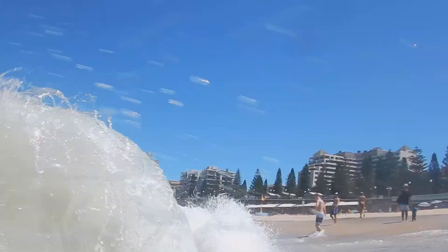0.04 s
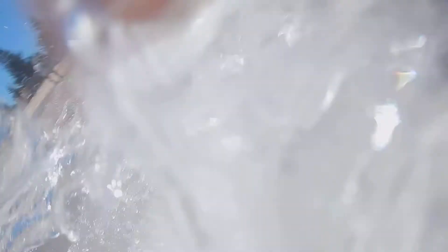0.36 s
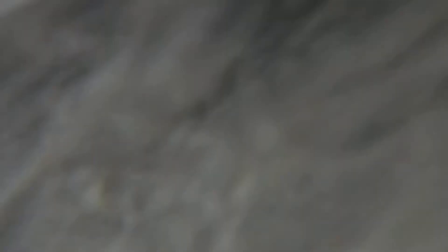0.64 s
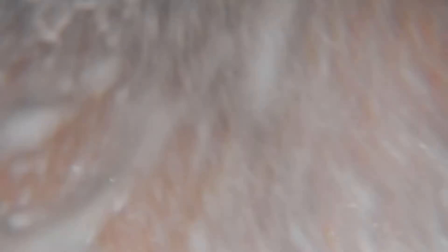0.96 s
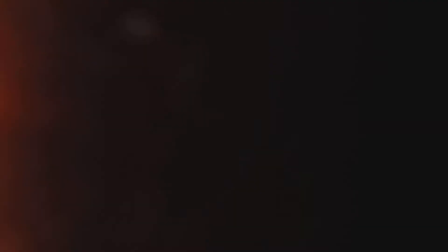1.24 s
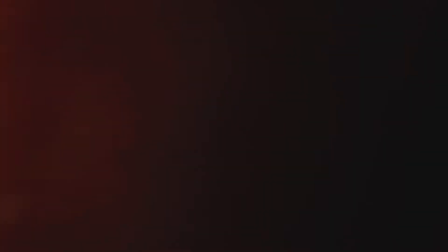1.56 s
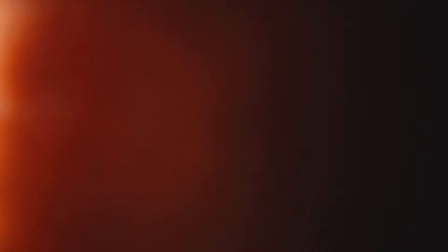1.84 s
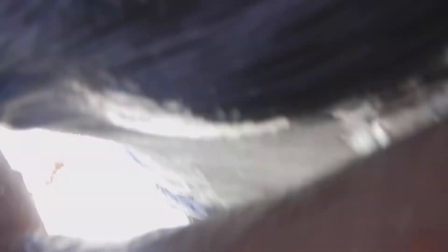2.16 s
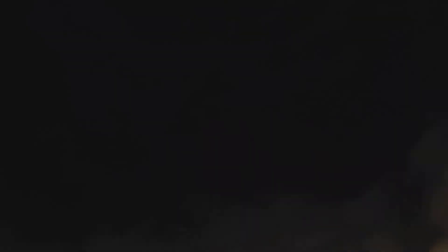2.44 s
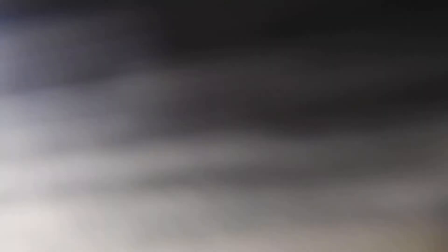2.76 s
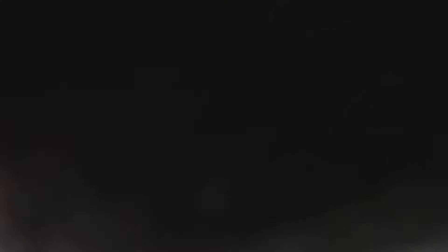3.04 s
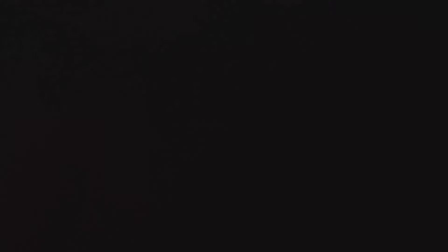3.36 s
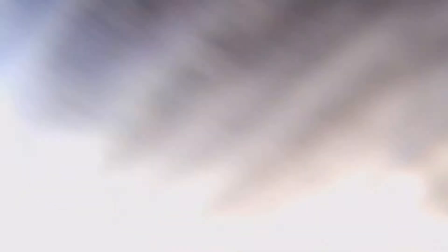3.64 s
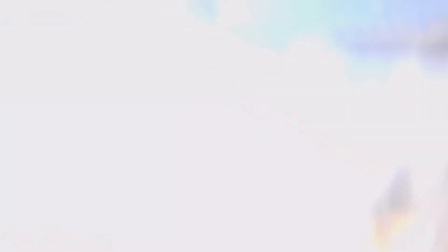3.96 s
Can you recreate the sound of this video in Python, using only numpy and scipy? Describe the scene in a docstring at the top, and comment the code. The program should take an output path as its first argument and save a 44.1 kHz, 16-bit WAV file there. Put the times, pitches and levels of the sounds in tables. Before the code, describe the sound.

Hissing surf breaks into loud churning bubbles, followed by dull underwater washing and bumps.

```python
"""A wave over a waterproof camera

Hissing surf closes in across the shallows, then a dense cloud of ringing bubbles churns against
the two microphone ports and overloads them. Under water all turns dull: gurgling, eddies and knocks
on one port or the other, and a faint fizz of foam as the camera tumbles near the surface."""
import sys
import numpy as np
from scipy import signal
from scipy.fft import rfft, irfft
from scipy.io import wavfile
from scipy.ndimage import uniform_filter1d, minimum_filter1d

SR = 44100
rng = np.random.default_rng(int(sys.argv[2]) if len(sys.argv) > 2 else 0)


def transcribe(signal):
    """Save signal, clipped to [-1, 1], as a 16-bit WAV file at the path in sys.argv[1]."""
    frames = np.atleast_2d(signal).T
    limited = np.clip(frames, -1, 1)
    pcm = np.round(limited * 32767).astype(np.int16)
    wavfile.write(sys.argv[1], SR, pcm)


N = 176400

# The bubble cloud's envelope. Each row: time in seconds, body level and spray level in relative dB.
CHURN_ENVELOPE = [(.42, -27, -32.5), (.485, -17.5, -34), (.52, -11, -33), (.58, -8, -22.5), (.83, -8, -26),
                  (.885, -19, -38.5), (.915, -11, -31), (.953, -25, -55), (.966, -7, -27.5),
                  (1.1, -17.5, -46.5), (1.125, -13, -29), (1.18, -16.5, -52), (1.245, -13.5, -38.5),
                  (1.305, -16.5, -42.5), (1.32, -20, -54), (1.38, -20, -55), (1.425, -28.5, -56),
                  (1.5, -25.5, -53), (1.6, -37, -73)]
# Envelopes of the other bubbling layers. Each row: time in seconds, level in relative dB.
SURF_ENVELOPE = [(0, -28.5), (.02, -25), (.10, -28), (.13, -21), (.178, -21.5), (.205, -31.5), (.3, -32.5),
                 (.39, -34.5), (.47, -26.5)]
GURGLE_ENVELOPE = [(1.55, -33.5), (1.66, -35.5), (1.77, -35.5), (1.82, -40.5), (1.9, -32.5), (1.97, -37),
                   (2.16, -35), (2.22, -66)]
WASH_ENVELOPE = [(2.2, -44.5), (2.45, -42), (2.6, -43), (2.72, -44), (2.78, -47), (3.0, -49), (3.15, -48),
                 (3.38, -41.5), (3.52, -47), (3.62, -38.5), (3.76, -39.5), (3.86, -44), (4, -44.5)]
FIZZ_ENVELOPE = [(1.76, -75), (1.82, -58), (1.92, -82.5), (2.18, -65), (2.3, -64), (2.55, -56.5),
                 (2.7, -49.5), (2.75, -70), (3.0, -76), (3.15, -68), (3.36, -70), (3.452, -48), (3.47, -75),
                 (3.56, -69), (3.595, -56), (3.78, -64), (3.87, -57), (3.96, -59)]
# The tone of each layer. Each row: frequency in Hz, gain in relative dB.
CHURN_EQ = [(30, -10), (60, -13), (110, 5), (220, -2.5), (330, 1), (560, -6), (760, -4), (1120, -5),
            (1600, -14.5), (2200, -12.5), (2600, -19), (4000, -41)]
SPRAY_EQ = [(1500, -20), (2900, 4.5), (4000, -7.5), (5600, -5), (7000, -13), (9000, -19.5), (10500, -29.5),
            (15500, -29)]
SURF_EQ = [(40, -4), (110, 4.5), (240, 6), (540, -0.5), (1650, -2), (2400, -10.5), (4200, -19.5),
           (5300, -10.5), (9300, -23.5), (12000, -49)]
EDDY_EQ = [(25, -8), (55, 0), (105, 5), (400, -12.5), (800, -19), (3200, -51)]
GURGLE_EQ = [(30, -4), (140, 10), (400, 2), (850, 0), (1900, -13.5), (2500, -29), (4000, -46), (5800, -36),
             (8000, -58)]
WASH_EQ = [(30, 11), (110, 3), (380, -5), (620, -4.5), (900, -10.5), (1400, -9), (2100, -9), (2700, -19),
           (4000, -34.5)]
FIZZ_EQ = [(1800, -4), (3100, 21.5), (4100, 15), (5700, 17), (7200, 0), (10000, -16.5), (15000, -38)]
# Balance between the ports. Each row: frequency in Hz, pan in dB (always left minus right).
CHURN_PAN = [(60, 41), (150, -4.5), (260, -7.5), (370, -4), (560, 3.5), (850, 7), (1250, 6.5), (2200, 2.5)]
WASH_PAN = [(40, -31), (90, -3.5), (550, -3), (900, -0.5), (1800, 13.5), (3500, -1.5)]
# Single large bubbles. Each row: start in seconds, level in dB, starting pitch in Hz,
# ring time in seconds, pan in dB.
GLUGS = [(0.499, 11, 402, 0.045, 10.5), (0.505, 5, 200, 0.18, 5.5), (0.584, 7, 334, 0.093, -11),
         (0.633, 7.5, 226, 0.1, -2), (.69, 6.5, 248.3, .2, -5.5), (.808, 6, 423, 0.096, -6),
         (0.908, 1.5, 940, 0.035, 5), (0.934, 0, 313, 0.073, -23), (1.045, 5, 430, 0.093, -11.5),
         (1.11, 3.5, 850, 0.17, 34), (1.163, -2, 325.5, 0.13, -8), (1.198, 0, 212, 0.081, -1),
         (1.234, 3.5, 277, 0.15, -11), (1.294, 6.5, 330, 0.055, -5.5), (1.403, 4, 1820, 0.02, 19),
         (1.547, 2, 1036, 0.047, 15), (1.697, -15, 870, 0.032, 8), (2.908, 3, 351, 0.025, -20),
         (2.914, 1, 508, .022, -40.5)]
# Water knocking on a port. Each row: start in seconds, level in dB before the low-pass, pitch in Hz,
# ring time in seconds, low-pass cutoff in Hz, pan in dB.
PORT_KNOCKS = [(1.477, 3.5, 89, 0.03, 400, 24), (1.563, 5, 320, 0.013, 900, -20),
               (1.579, -2, 111, 0.037, 500, -18), (1.914, -1, 100, 0.016, 303, 28),
               (2.127, 6, 160, 0.028, 454, -25), (2.146, -2.5, 180, 0.014, 1190, 21),
               (2.167, 2.5, 185, 0.024, 1030, -22), (2.245, -7, 110, .013, 1110, 29),
               (2.639, 2, 277, 0.021, 1100, -23), (2.832, 1.5, 183, 0.023, 900, -27),
               (2.849, -10.5, 82, 0.22, 200, -33), (2.907, -0.5, 223, 0.035, 890, -27.5),
               (2.98, -21, 146, 0.065, 616, -23.5), (3.165, -21, 410, 0.018, 1000, -15),
               (3.419, 1, 95, 0.025, 2620, -34), (3.462, -7, 102, 0.079, 400, -27.5),
               (3.57, -2, 91, 0.032, 298, -36), (3.593, -4.5, 45, 0.035, 470, -37),
               (3.829, 4.5, 101, 0.024, 2290, -52)]
# Spits and gushes of water and air. Each row: start in seconds, level in dB, band centre in Hz,
# decay in seconds, pan in dB.
PORT_SPITS = [(0.238, -23.5, 4460, 0.0056, 4), (0.468, -15, 5300, 0.0074, -6),
              (0.59, -14.5, 11500, 0.0041, 55), (.91, -17, 2580, 0.0057, 8),
              (.965, -20.5, 12300, 0.0034, 2), (0.963, -22.5, 6100, 0.0044, 2),
              (1.232, -25, 4200, 0.0023, 1), (1.402, -30, 4350, 0.0025, 0.5), (1.455, -38, 4630, 0.014, 1),
              (1.544, -5.5, 970, 0.01, 4.5), (1.548, -17, 3000, 0.004, 13), (2.085, -20.5, 1260, 0.002, 11),
              (2.167, -21.5, 1030, 0.0043, -6), (2.244, -35, 4240, 0.00098, 4),
              (2.595, -27, 700, 0.059, -8), (2.637, -18, 520, 0.031, -16), (2.833, -19.5, 1100, 0.0015, -4),
              (3.419, -19.5, 3700, 0.0017, -2), (3.42, -23, 970, 0.0032, -7),
              (3.829, -26.5, 7100, 0.0022, -5.5), (3.86, -32, 2150, 0.0044, -13),
              (3.864, -52.5, 6960, 0.018, -5), (3.912, -26, 1860, 0.0034, -1)]
# Eddies buffeting a port. Each row: start in seconds, hold in seconds, level in dB, pan in dB.
PORT_EDDIES = [(0.18, 0.02, -9.5, 28), (0.388, 0.099, -20, 2), (0.492, 0.44, -14.5, -5),
               (1.01, 0.32, -17, 2), (1.446, 0.073, -18.5, 2), (1.54, 0.061, -14.5, -16),
               (1.967, 0.12, -21.5, 17), (2.012, 0.057, -22, 23), (2.639, 0.079, -10.5, -27.5),
               (3.459, 0.063, -26, -29.5), (3.57, 0.016, -15, -21), (3.957, 0.019, -27.5, -6)]


def churn():
    """Big bubbles tumble right at the ports, with a crackling spray of small ones on top."""
    big = cloud(170.6, 1907, per_s=800, cycles=21.5, spread_db=2.5, rush=0.41)
    small = cloud(2180, 20300, per_s=2700, cycles=18, spread_db=0, rush=0.66)
    body = equalise(big, CHURN_EQ, (200, 2000), CHURN_PAN)
    body *= envelope(CHURN_ENVELOPE, column=1, fade_db_per_s=402)
    spray = equalise(small, SPRAY_EQ, (3000, 9000))
    spray *= envelope(CHURN_ENVELOPE, column=2, fade_db_per_s=402)
    return body * from_db(-2.5 + 1.2 * flutter(30)) + spray * from_db(-1 + 2.2 * flutter(40))


def glugs(rise_per_s=2.5, attack_share=0.061):
    """Each large bubble swells into a short tone that bends upward as it rings out."""
    out, t = np.zeros((2, N)), np.arange(SR // 5) / SR
    for start, db, hz, ring_s, pan_db in GLUGS:
        tone = np.sin(2 * np.pi * hz * t * (1 + rise_per_s * t / 2))
        attack = 1 - np.exp(-t / (attack_share * ring_s))
        add(out, start, from_db(db - 60 * t / ring_s) * attack * tone * pan(pan_db))
    return out


def knocks():
    """A jolt of pressure with a rounded edge swings back and dies away: a dull thump."""
    out, t = np.zeros((2, N)), np.arange(SR // 5) / SR
    for start, db, hz, ring_s, cutoff_hz, pan_db in PORT_KNOCKS:
        ring = np.sin(2 * np.pi * hz * t) * from_db(-60 * t / ring_s)
        swing = -np.gradient(ring, t) / (2 * np.pi * hz)
        thump = signal.sosfilt(signal.butter(2, cutoff_hz, fs=SR, output="sos"), swing)
        add(out, start, from_db(db) * pan(pan_db) * thump)
    return out


def eddies(attack_s=0.008, release_s=0.017):
    """Pressure swings in a lumpy rumble while an eddy sits on a port."""
    t, gain = np.arange(N) / SR, 0
    for start, hold, db, pan_db in PORT_EDDIES:
        before, after = np.maximum(start - t, 0), np.maximum(t - start - hold, 0)
        gain += from_db(db) * pan(pan_db) * np.exp(-before / attack_s - after / release_s)
    return gain * equalise(rng.standard_normal((2, N)), EDDY_EQ, (20, 8000))


def surf():
    """The breaking crest hisses and spatters until the water covers the ports."""
    spatter = cloud(430, 9800, per_s=5700, cycles=2.8, spread_db=5, rush=0.78)
    gain = envelope(SURF_ENVELOPE, fade_db_per_s=251.5) * from_db(1.5 + 2.6 * flutter(51))
    return gain * equalise(spatter, SURF_EQ, (1500, 10000))


def spits(edge_ratio=1.28):
    """Short bursts of band-passed noise as water hits or clears a port."""
    out, t = np.zeros((2, N)), np.arange(SR // 5) / SR
    for start, db, hz, decay, pan_db in PORT_SPITS:
        edges_hz = [hz / edge_ratio, min(hz * edge_ratio, 0.45 * SR)]
        band = signal.butter(2, edges_hz, "band", fs=SR, output="sos")
        noise = rng.standard_normal((3, len(t)))  # left, right, common to both
        burst = rms_one(signal.sosfilt(band, noise[:2] + 0.4 * noise[2]))
        shape = (2 * t / decay) * np.exp(1 - 2 * t / decay)
        add(out, start, from_db(db) * pan(pan_db) * burst * shape)
    return out


def gurgle():
    """Thinner, duller bubbling once the camera is deep under."""
    bubbling = cloud(355, 1890, per_s=900, cycles=14, spread_db=3.5, rush=0.8)
    gain = envelope(GURGLE_ENVELOPE) * from_db(-1 + 2 * flutter(9.7))
    return gain * equalise(bubbling, GURGLE_EQ, (400, 2000))


def foam(crossover_hz=760):
    """Foam slips round the housing behind the wave: a muffled wash and spurts of fine fizz."""
    wash = cloud(250, 3280, per_s=2500, cycles=25, spread_db=2.5, rush=0.8)
    fizz = cloud(2000, 8000, per_s=1100, cycles=30, spread_db=3.5, rush=0.5)
    wash = equalise(wash, WASH_EQ, (300, 2500), WASH_PAN)
    fizz = equalise(fizz, FIZZ_EQ, (3000, 8000)) * envelope(FIZZ_ENVELOPE)
    flow = envelope(WASH_ENVELOPE)
    bass = signal.sosfiltfilt(signal.butter(4, crossover_hz, fs=SR, output="sos"), wash)
    treble = (wash - bass) * flow / flow.max()  # the wash brightens as it swells
    return (bass + treble) * flow * from_db(1 + 2.1 * flutter(12)) + fizz * from_db(3 * flutter(38))


def cloud(low_hz, high_hz, per_s, cycles, spread_db, rush, pitches=36):
    """Bubbles pop up at random at each port and ring some cycles, over the smooth rush of far ones."""
    born = rng.random((2, N)) < per_s / SR
    sizes = from_db(spread_db * np.minimum(rng.exponential(1, (2, N)), 4))
    kicks = born * sizes * rng.choice([-1, 1], (2, N))
    pitch_index, near = rng.integers(0, pitches, (2, N)), 0
    for k, hz in enumerate(np.geomspace(low_hz, min(high_hz, 0.42 * SR), pitches)):
        radius, angle = from_db(-60 * hz / (cycles * SR)), 2 * np.pi * hz / SR
        drive = kicks * (pitch_index == k) + 1e-12 * kicks[:, ::-1] + 1e-18  # never quite silent
        ringing = signal.lfilter([1, -1], [1, -2 * radius * np.cos(angle), radius ** 2], drive)
        near += np.sqrt(hz) * rms_one(ringing)
    far = rng.standard_normal((2, N)) * np.sqrt(SR / 2 / high_hz)
    return rms_one(near) + rush * far


def equalise(x, eq, band_hz, pan_curve=((100, 0), (1000, 0)), bleed=0.084):
    """Bleed the ports together, then EQ and pan; flat noise comes out at unit power within band_hz."""
    hz = np.maximum(np.arange(N // 2 + 1) * SR / N, 1)
    roll_off = (1 + (hz / (0.95 * eq[-1][0])) ** 8) * (1 + (18 / hz) ** 2)  # top end and sub-bass
    gain = from_db(at_hz(eq, hz)) / roll_off * pan(at_hz(pan_curve, hz))
    power = np.mean(gain ** 2 * ((hz > band_hz[0]) & (hz < band_hz[1])))
    blended = rms_one(x + bleed * x[::-1])
    return irfft(rfft(blended) * gain, N) / np.sqrt(power)


def envelope(rows, column=1, fade_db_per_s=400):
    """Gain along a level curve, fading away beyond both ends."""
    rows, t = np.array(rows), np.arange(N) / SR
    outside = np.maximum(rows[0, 0] - t, 0) + np.maximum(t - rows[-1, 0], 0)
    return from_db(np.interp(t, rows[:, 0], rows[:, column]) - np.minimum(fade_db_per_s * outside, 150))


def flutter(rate_hz, hop=40):
    """A smooth random wobble of unit power for each port."""
    pole = np.exp(-2 * np.pi * rate_hz * hop / SR)
    noise = rng.standard_normal((2, N // hop + 2002))
    slow = signal.lfilter([1], [1, -2 * pole, pole ** 2], noise)[:, 2000:]  # skip the run-in
    return np.array([np.interp(np.arange(N) / hop, np.arange(len(s)), rms_one(s)) for s in slow])


def at_hz(points, hz):
    """Read a curve on a log-frequency axis."""
    points = np.array(points)
    return np.interp(np.log(hz), np.log(points[:, 0]), points[:, 1])


def pan(pan_db):
    """Left and right gains; the farther port is the weaker."""
    return from_db(np.minimum(np.array([[1], [-1]]) * pan_db, 0))


def from_db(db):
    """Decibels to gain."""
    return 10 ** (np.asarray(db) / 20)


def rms_one(x):
    """Scale to unit power."""
    return x / np.sqrt(np.mean(x ** 2) + 1e-20)


def add(out, start_s, sound):
    """Drop a short sound into the mix."""
    i = int(start_s * SR)
    out[:, i:i + sound.shape[1]] += sound[:, :N - i]


def scene(notch_hz=2498):
    """All the water layers together; the ports swallow one narrow band."""
    water = surf() + churn() + gurgle() + foam() + eddies() + knocks() + glugs() + spits()
    return signal.lfilter(*signal.iirnotch(notch_hz, Q=17.4, fs=SR), water)


def record(dry, ceiling=0.98, attack_s=0.00023, release_db_per_s=703.5, stopband_hz=17000):
    """A fast limiter on each channel pins the peaks, then a steep low-pass takes off the very top."""
    release_db = release_db_per_s * np.arange(N) / SR
    over_db = 20 * np.log10(np.maximum(np.abs(dry) / ceiling, 1))
    reduction_db = np.maximum.accumulate(over_db + release_db, axis=1) - release_db
    window = 2 * int(attack_s * SR) + 1
    gain = uniform_filter1d(minimum_filter1d(from_db(-reduction_db), window), window)
    return signal.sosfilt(signal.cheby2(12, 60, stopband_hz, fs=SR, output="sos"), dry * gain)


dry = scene()
out = record(dry)
transcribe(out)
```